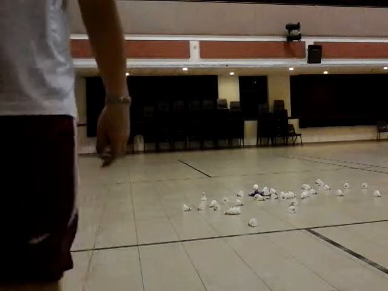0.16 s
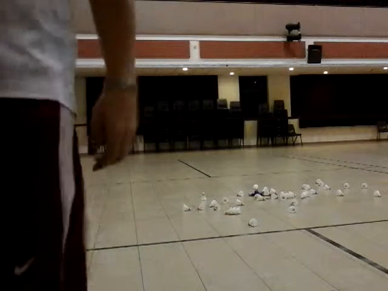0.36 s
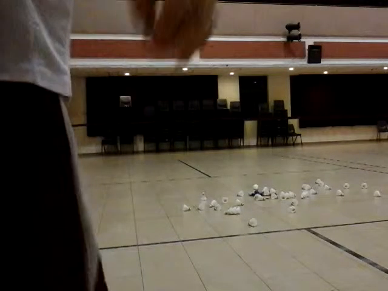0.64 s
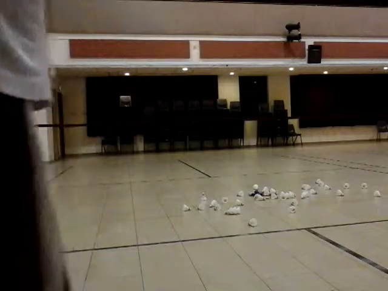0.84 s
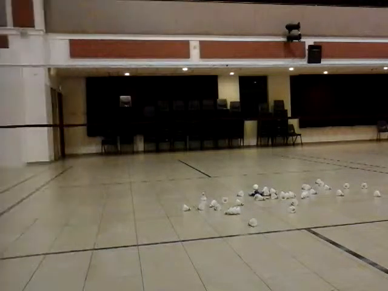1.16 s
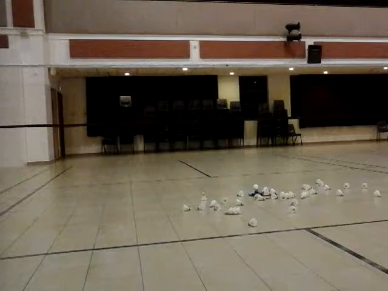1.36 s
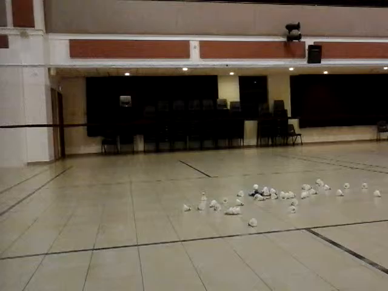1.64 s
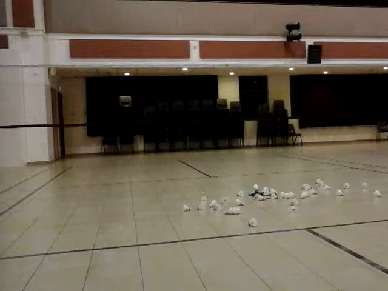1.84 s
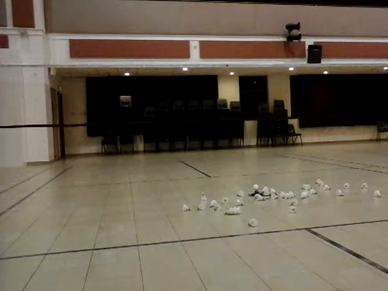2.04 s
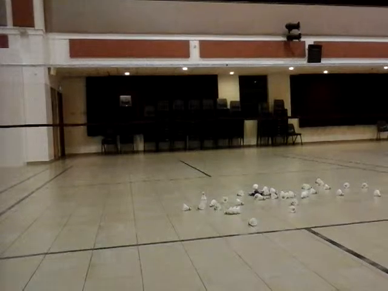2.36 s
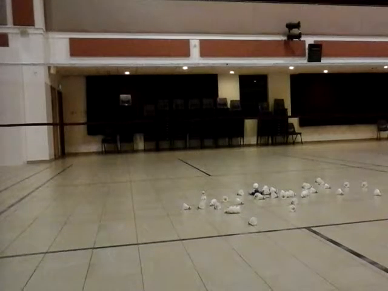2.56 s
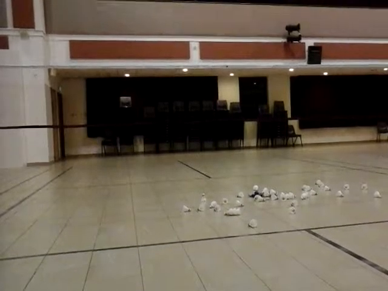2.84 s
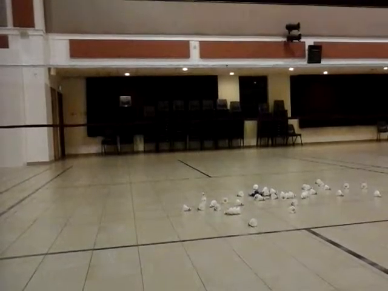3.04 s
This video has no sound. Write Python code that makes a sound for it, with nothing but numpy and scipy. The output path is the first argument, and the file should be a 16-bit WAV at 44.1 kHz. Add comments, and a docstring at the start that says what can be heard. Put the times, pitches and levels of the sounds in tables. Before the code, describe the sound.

Rubber-soled shoes squeak sharply four times on the smooth floor of a large sports hall, each squeak ringing on. Soft footsteps come first, and small clicks near the microphone and light scuffs fall in between, over faint ventilation rumble.

```python
"""Rubber soles squeak four times on the smooth floor of a large sports hall, heard at one microphone.
Each squeak is a stick-slip tone whose pitch sags as the sole grips; near walls repeat it and the
hall rings on. Soft footfalls, small clicks close by, the hiss of sliding soles and the rub of a
planted foot lie over the room tone, a low ventilation rumble."""
import sys
import numpy as np
from scipy import signal
from scipy.fft import rfft, irfft, next_fast_len
from scipy.io import wavfile
from scipy.ndimage import uniform_filter1d, minimum_filter1d, map_coordinates

SR = 44100
rng = np.random.default_rng(int(sys.argv[2]) if len(sys.argv) > 2 else 0)


def store_wav(level_fs):
    """Save 16-bit WAV to argv[1]."""
    pcm = np.round(np.clip(np.atleast_2d(level_fs), -1, 1) * 32767)
    wavfile.write(sys.argv[1], SR, pcm.T.astype(np.int16))


N = 141120

# one slide of a sole each (A overlaps B, E runs into F): t/s, slip rate/Hz, level/dB, overtone gain/dB
SLIDE_A = [(1.2585, 2623, -16, -2), (1.265, 2662, -18.5, 7.5), (1.276, 2792, -22, 8.5),
           (1.280, 2636, -24, 11), (1.288, 2548, -13, -3.5), (1.298, 2680, -10.5, 4.5),
           (1.305, 2686, -13.5, -6), (1.324, 2610, -13.5, 1), (1.338, 2530, -19, -28)]
SLIDE_B = [(1.285, 3596, -31, 4), (1.31, 3590, -25.5, -7), (1.325, 3588, -23.5, -17),
           (1.342, 3538, -27, 9.5), (1.355, 3640, -36, -1)]
SLIDE_C = [(1.586, 3910, -22.5, 20), (1.590, 3790, -6, 3.5), (1.5925, 3946, -17, -14),
           (1.595, 4144, -5.5, -16), (1.600, 3900, -3.5, -11), (1.610, 3710, -10.5, 0.5),
           (1.6185, 3530, -12, 8), (1.622, 3104, -21, 8.5), (1.625, 2820, -35.5, 12)]
SLIDE_D = [(2.153, 3205, -31, 0), (2.159, 3263, -31, 3), (2.162, 3140, -14, -11), (2.1655, 3116, -16, 3.5),
           (2.168, 2770, -24, -2.5), (2.171, 2660, -39, -1)]
SLIDE_E = [(2.951, 2604, -3, 0), (2.953, 2525, -18, 0), (2.956, 2420, -12, 3), (2.959, 2300, -18.5, 5)]
SLIDE_F = [(2.958, 2280, -19.5, -4), (2.965, 2206, -11, -1), (2.973, 2196, -16, -8.5),
           (2.982, 2065, -21.5, 9.5), (2.988, 2172, -18, 5.5), (2.996, 2208, -7, -4.5),
           (3.004, 2222, -7, -29), (3.014, 2128, -19, -19), (3.03, 2150, -41, 1)]
# how each slide reaches the microphone: slide, wall echoes/dB, fundamental to hall/dB,
# overtones to hall/dB, roughness (0-1), rasp/dB, partial levels/dB
SQUEAKS = [ (SLIDE_A, 0, -2.5, -6, 0.47, -22, [-15, -4.5, -15, -28.5, -33.5]),
           (SLIDE_B, -2.2, -0.5, 0.5, 0.61, -11.5, [-8.5, 0, -29]),
           (SLIDE_C, 1.4, -14.5, -5.5, 0.25, -27.5, [0, -1.2, -27]),
           (SLIDE_D, -1.4, -15, -0.89, 0.226, -15, [-1, 2, -20, -32]),
           (SLIDE_E, -2, 0, -1, .35, -26, [-7, -1, -5, -28, -20]),
           (SLIDE_F, -10, 1.1, -1.6, 0.479, -28, [-2, 1, 5, -6.5, -21.5, -30]), ]
# footfalls: t/s, level/dB, centre f/Hz
FOOTFALLS = [(.291, -46, 890), (0.353, -33, 403), (1.003, -39.5, 705), (1.063, -33.5, 600),
             (1.585, -32.5, 490), (1.645, -22, 460), (2.144, -27, 1070), (2.177, -33.5, 630)]
# small clicks close by: t/s, level/dB
CLICKS = [(0.38, -35), (0.386, -29.5), (0.396, -30.5), (.409, -32.5), (0.601, -44), (.965, -42.5),
          (1.002, -41), (1.063, -41.5), (1.171, -33), (1.77, -23), (2.243, -22), (2.599, -37), (2.645, -31),
          (2.767, -39.5)]
# soles brushing the floor: t/s, length/s, level/dB
SCUFFS = [(1.243, .012, -41.5), (2.143, 0.012, -36.5), (2.392, 0.035, -35.5), (2.483, 0.086, -30),
          (2.567, 0.035, -36), (2.622, 0.046, -31.5), (2.722, 0.044, -38), (2.826, 0.12, -39)]
# rub of the planted foot: t/s, level/dB
DRAG_LEVEL = [(2.235, -71), (2.245, -44), (2.28, -33.5), (2.35, -40.5), (2.45, -43.5), (2.56, -40),
              (2.7, -46.5), (2.79, -59), (2.82, -46.5), (2.95, -63), (3.1, -78)]
# ventilation noise: t/s, level/dB
VENT_LEVEL = [(0, -51), (.3, -50), (.65, -48.5), (1.0, -50.5), (1.7, -46.5), (2.55, -48.5), (3.2, -44)]
# noise spectra of squeak rasp, clicks, scuffs, drag and ventilation: f/Hz, level/dB
RASP_SPECTRUM = [(1500, -15), (2000, -19), (3000, -0.5), (4200, 0), (8000, 3), (9500, -12), (14000, -27)]
CLICK_SPECTRUM = [(200, -22), (1500, -10), (4000, -1), (7500, 7.5), (10000, -8.5), (14000, -16)]
SCUFF_SPECTRUM = [(300, -15), (2000, -23.5), (3500, -17.5), (5600, -22), (6700, 10), (7800, 4), (9000, -14),
                  (13000, -16.5), (15000, -18)]
DRAG_SPECTRUM = [(30, -23), (120, 8), (300, 6), (700, -3), (1500, -7.5), (4500, -7.5), (7000, 8.5),
                 (9500, -8.5), (14000, -18)]
VENT_SPECTRUM = [(20, -45), (40, -9), (70, -12.5), (100, 1), (150, -4.5), (280, -9), (550, -15),
                 (950, -20.5), (1450, -21), (2700, -29), (4000, -28.5), (5400, -30), (7200, -22.5),
                 (9000, -31), (14000, -32)]
# echoes off the near walls: delay/s, level/dB
WALL_ECHOES = [(0.0162, -14), (0.0323, -17.5), (0.0371, -11.5), (.053, -34)]
# reverberation time of the hall: f/Hz, T60/s
HALL_T60 = [(150, 0.88), (1000, 1.73), (3000, 1.08), (7000, 0.81), (13000, 0.62)]


def stick_slip(slide, roughness, rasp_db, partials_db, grip_s=0.00091, jitter=0.029, flutter_db=6):
    """Rubber sticks and slips thousands of times a second; returns fundamental and rasping overtones."""
    t = clock()
    times, slip_hz, level_db, overtone_db = np.transpose(slide)
    gate = np.clip(np.minimum(t - times[0], times[-1] - t) / grip_s, 0, 1)
    level = gate * amp(np.interp(t, times, level_db))
    pitch_hz = np.interp(t, times, slip_hz) * (1 + jitter * roughness * wobble(1100))
    phase = 2 * np.pi * np.cumsum(pitch_hz) / SR
    partials = [amp(db + flutter_db * roughness * wobble(260)) * np.sin(k * phase)
                for k, db in enumerate(partials_db, 1)]
    overtones = amp(np.interp(t, times, overtone_db)) * sum(partials[1:])
    rasp = amp(rasp_db) * noise(RASP_SPECTRUM)
    return level * partials[0], level * (overtones + rasp)


def squeaks():
    """Squeaks, direct and off the walls; the shoe throws low and high tones into the hall differently."""
    out = np.zeros(N)
    for slide, wall_db, low_hall_db, high_hall_db, roughness, rasp_db, partials_db in SQUEAKS:
        fundamental, overtones = stick_slip(slide, roughness, rasp_db, partials_db)
        direct = fundamental + overtones
        tail = hall(amp(low_hall_db) * fundamental + amp(high_hall_db) * overtones)
        out += direct + amp(wall_db) * walls(direct) + tail
    return out


def sole_pat(centre_hz, width=0.67, dull_hz=2200):
    """The dull band of noise of a soft sole meeting the floor."""
    def response(hz):
        damping = 1j * hz * centre_hz * width
        return damping / (centre_hz ** 2 - hz ** 2 + damping) / (1 + (hz / dull_hz) ** 4)
    return unit(filtered(rng.standard_normal(N), response))


def footfalls(pat_t60_s=0.023, thud_t60_s=0.091, thud_hz=222, thud_db=-14, hall_db=-10.5):
    """Soft soles land: a short pat over a low thud as the floor gives."""
    pats = sum(amp(db) * decay(s, pat_t60_s) * sole_pat(hz) for s, db, hz in FOOTFALLS)
    thud = noise([(thud_hz / 4, -25), (thud_hz / 2, 0), (thud_hz * 2, -3), (thud_hz * 8, -50)])
    thud_level = sum(amp(db + thud_db) * decay(s, thud_t60_s) for s, db, _ in FOOTFALLS)
    direct = pats + thud_level * thud
    return direct + amp(hall_db) * hall(direct)


def clicks(t60_s=0.0075, hall_db=-10):
    """Small bright clicks close to the microphone, with a little of the hall behind them."""
    direct = sum(amp(db) * decay(s, t60_s) for s, db in CLICKS) * noise(CLICK_SPECTRUM)
    return direct + amp(hall_db) * hall(direct)


def scuffs(rise_s=0.025, fall_s=0.016, grain_db=2, hall_db=-23.5):
    """Soles brush the floor without gripping: a grainy hiss, almost dry."""
    t = clock()
    strokes = np.zeros(N)
    for start, length, db in SCUFFS:
        rise = (t - start) / min(rise_s, length / 4)
        fall = (start + length - t) / min(fall_s, length / 4)
        strokes += amp(db) * np.clip(np.minimum(rise, fall), 0, 1)
    direct = strokes * amp(grain_db * wobble(390)) * noise(SCUFF_SPECTRUM)
    return direct + amp(hall_db) * hall(direct)


def foot_drag(grain_db=2, ring_start_s=2.245, ring_hz=1154, ring_db=-49):
    """A planted foot drags with a broad rubbing noise; a faint ring follows."""
    t = clock()
    level_db = np.interp(t, *np.transpose(DRAG_LEVEL), left=-120) + grain_db * wobble(220)
    ring = amp(ring_db) * decay(ring_start_s, t60_s=1) * np.sin(2 * np.pi * ring_hz * t)
    return amp(level_db) * noise(DRAG_SPECTRUM) + ring


def walls(x):
    """Distinct early echoes from the near walls."""
    return sum(amp(db) * np.pad(x, (round(s * SR), 0))[:N] for s, db in WALL_ECHOES)


def hall(x, delay_s=0.004, build_s=0.01):
    """The diffuse tail of the hall; the treble dies first."""
    hz, t, spectrum = signal.stft(rng.standard_normal(2 * SR), SR, nperseg=256)
    fade = amp(-60 * t / along(HALL_T60, hz)[:, None])
    tail = signal.istft(spectrum * fade, SR, nperseg=256)[1]
    age = np.maximum(np.arange(len(tail)) / SR - delay_s, 0)
    tail *= 1 - np.exp(-age / build_s)
    return signal.fftconvolve(x, tail / np.linalg.norm(tail))[:N]


def ventilation(swell_db=0.63, hum_hz=97.4, hum_db=-59.5, waver_db=3):
    """Room tone: the rumble and hiss of the ventilation, with a wavering hum."""
    t = clock()
    hum = amp(hum_db + waver_db * wobble(7.85)) * np.sin(2 * np.pi * hum_hz * t + wobble(8.5))
    level_db = np.interp(t, *np.transpose(VENT_LEVEL)) + swell_db * wobble(4.41)
    return amp(level_db) * noise(VENT_SPECTRUM) + hum


def amp(db):
    """Decibels to gain."""
    return 10 ** (np.asarray(db) / 20)


def unit(x):
    """Scale to rms 1."""
    return x / np.sqrt(np.mean(x ** 2) + 1e-20)


def clock():
    """Time of every sample."""
    return np.arange(N) / SR


def along(points, hz):
    """Interpolate (f/Hz, value) points on a log frequency axis."""
    f, values = np.transpose(points)
    return np.interp(np.log(hz + 1), np.log(f + 1), values)


def wobble(rate):
    """A smooth random curve, rate knots a second."""
    return map_coordinates(rng.standard_normal(N // 8), [clock() * rate], mode="wrap")


def filtered(x, response):
    """Pass x through a frequency response."""
    size = next_fast_len(N + SR // 2)
    return irfft(rfft(x, size) * response(np.fft.rfftfreq(size, 1 / SR)), size)[:N]


def noise(spectrum):
    """Noise of rms 1 with the given spectrum."""
    return unit(filtered(rng.standard_normal(N), lambda hz: amp(along(spectrum, hz))))


def decay(start_s, t60_s):
    """An envelope that jumps to 1 and dies away."""
    age = clock() - start_s
    return (age >= 0) * amp(-60 * np.maximum(age, 0) / t60_s)


def scene():
    """All sources at one microphone in the hall."""
    return (squeaks() + footfalls() + clicks() + scuffs() + foot_drag() + ventilation())[None]


def record(dry, low_cut_hz=55, ceiling=0.88, limiter_s=0.004, top_hz=13950):
    """The microphone chain: bass roll-off, peak limiter and a steep treble cut."""
    thinned = filtered(dry[0], lambda hz: 1j * hz / (low_cut_hz + 1j * hz))
    window = round(limiter_s * SR)
    gain = ceiling / np.maximum(np.abs(thinned), ceiling)
    limited = thinned * uniform_filter1d(minimum_filter1d(gain, 2 * window), window)
    return filtered(limited, lambda hz: 1 / np.sqrt(1 + (hz / top_hz) ** 200))[None]


dry = scene()
out = record(dry)
store_wav(out)
```